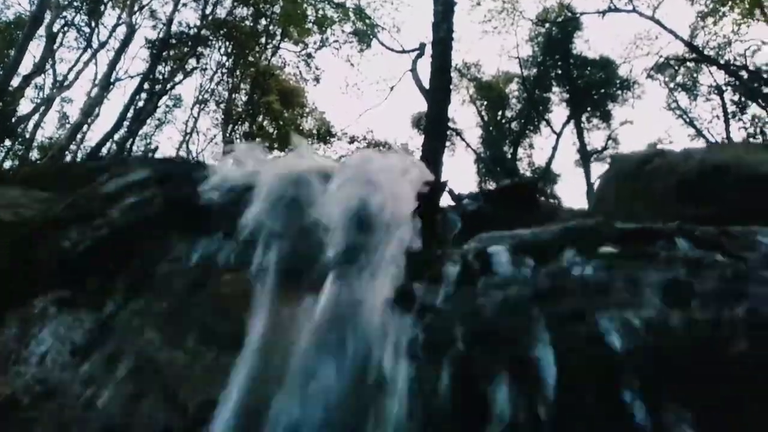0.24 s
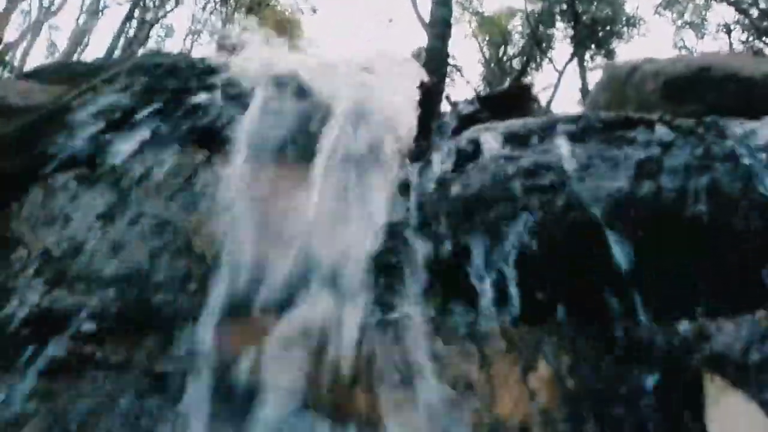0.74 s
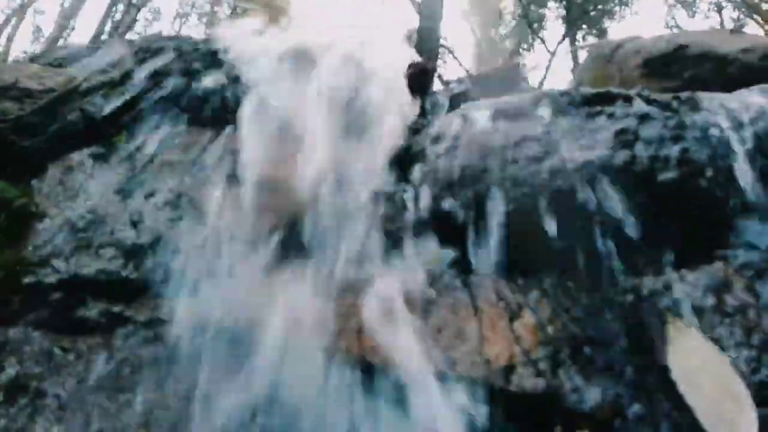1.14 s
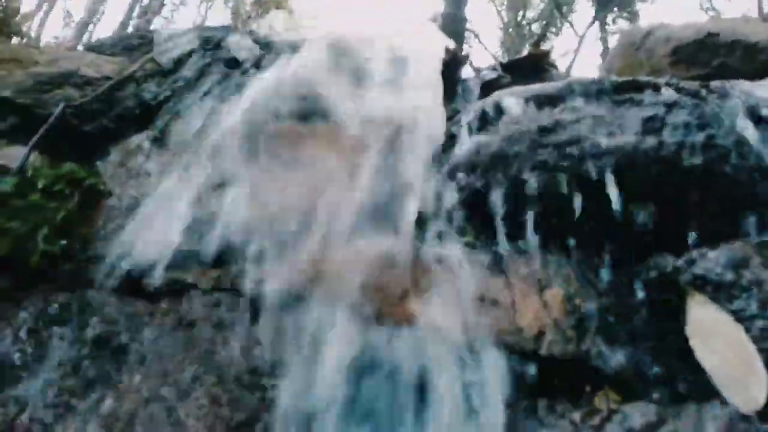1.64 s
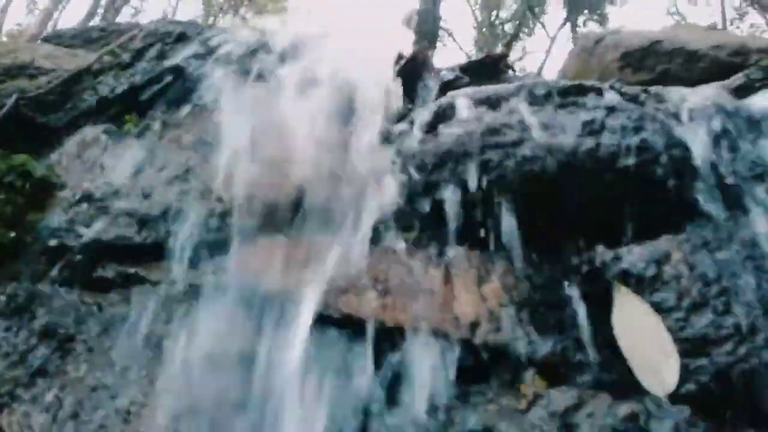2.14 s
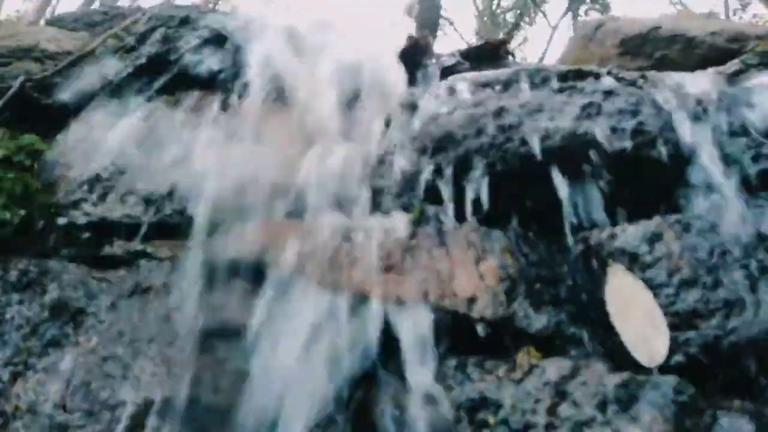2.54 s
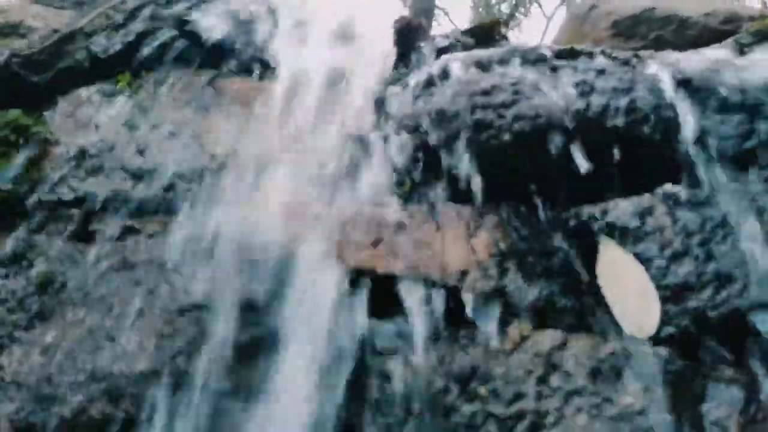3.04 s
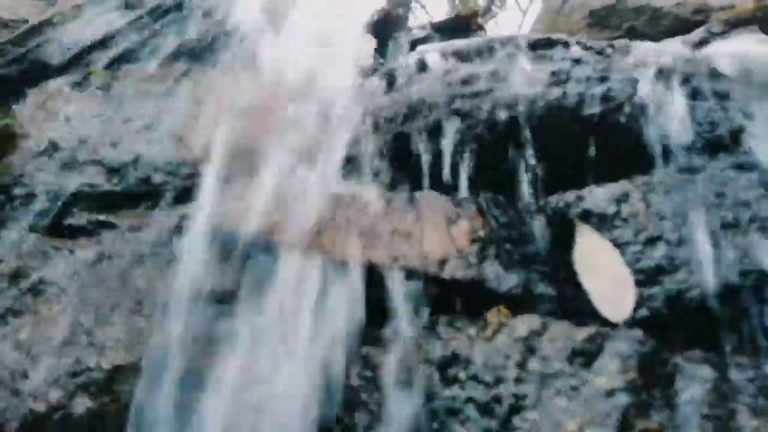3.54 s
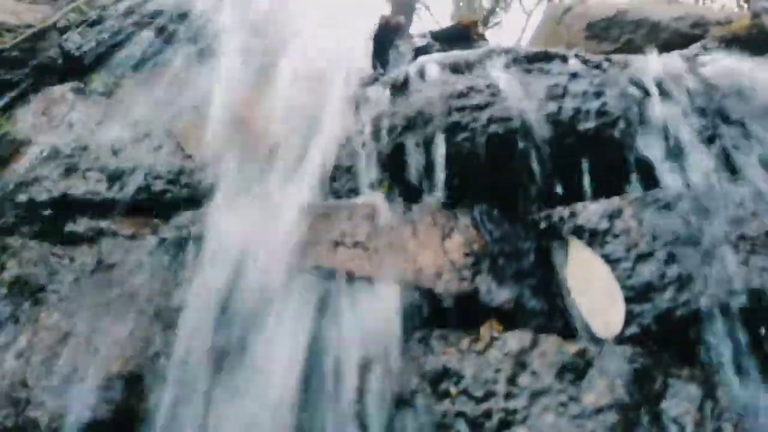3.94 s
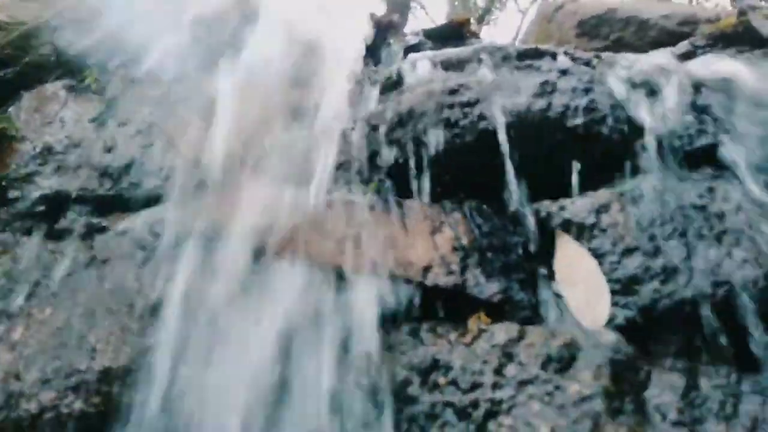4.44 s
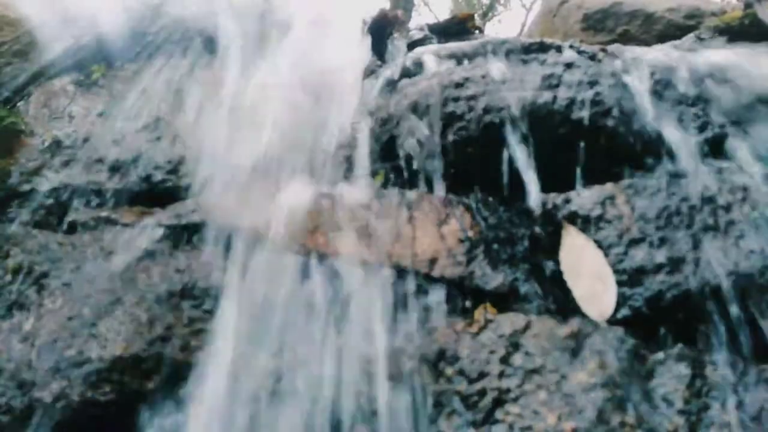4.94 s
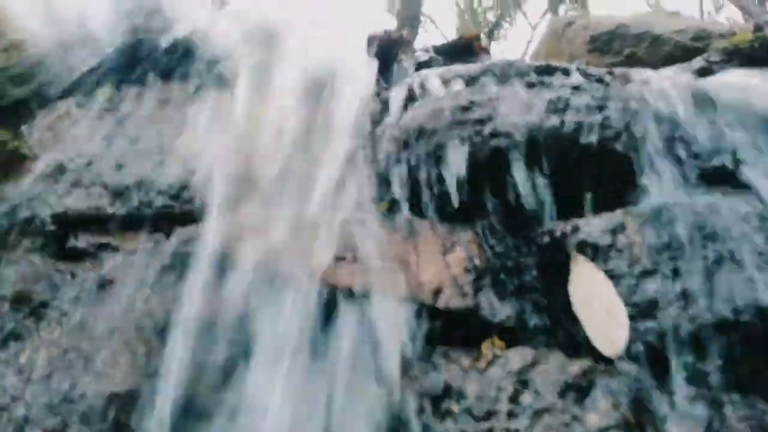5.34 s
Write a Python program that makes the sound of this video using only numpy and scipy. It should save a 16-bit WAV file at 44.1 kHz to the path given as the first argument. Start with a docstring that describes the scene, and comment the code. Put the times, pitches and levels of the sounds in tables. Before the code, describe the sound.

From the start, a small waterfall splashes over rocks close to a hand-held mono microphone. Spray fizzes, drops tick, clumps of water slap the stone and bubbles give short gulps. The flow is fairly steady, with brief dips near 0.1 and 0.9 seconds. From about 1.4 seconds a hand rubs the microphone, making a low rumble, with a quick cluster of dull thuds around 1.8 seconds and softer ones near 2.2. From about 1.7 seconds the hand also cups the microphone, so the water takes on a hollow tone that rises in pitch. At about 2.3 seconds everything cuts to silence. Just after 2.5 seconds the water returns much quieter, with the hollow tone and handling noise gone. It continues as a faint splashing hiss with small gurgles and slight lulls until the end at about 5.6 seconds.

```python
"""A small forest waterfall splashes over rocks, close to a hand-held mono microphone.
The stream swells, gushes and parts. Spray fizzes, drops tick, clumps of water slap the stone and
trapped air rings as bubbles. A hand rubs and bumps the camera and cups its microphone, which adds
a hollow tone. Then the sound cuts out for a moment and comes back much quieter."""
import sys
import numpy as np
from scipy import signal
from scipy.fft import rfft, irfft
from scipy.io import wavfile
from scipy.ndimage import uniform_filter1d

SR = 44100
rng = np.random.default_rng(int(sys.argv[2]) if len(sys.argv) > 2 else 0)


def file_out(sig):
    """Save sig as 16-bit WAV at sys.argv[1]."""
    # one column per channel
    cols = np.atleast_2d(sig).T
    # limit, then scale
    lim = np.clip(cols, -1, 1)
    pcm = np.round(lim * 32767).astype(np.int16)
    wavfile.write(sys.argv[1], SR, pcm)


N = 246959
TIME, FREQS = np.arange(N) / SR, np.fft.rfftfreq(N, 1 / SR)
GAP_START_S, GAP_END_S = 2.339, 2.549  # the sound cuts out between these times

# The tone of splashing water, from bass to treble: frequency_hz, level_db
WATER_TONE = [(25, -30), (70, -8.5), (150, -4.5), (330, -8), (500, -0.5), (1000, 1.5), (2200, -1.5),
              (3700, -4.5), (5200, -4.5), (6500, 0.5), (7400, -5), (8500, -9.5), (10500, -11)]


def amp(db):
    """Turns decibels into a number to multiply a sound by."""
    return 10 ** (np.asarray(db) / 20)


def unit(x):
    """Scales a signal to an average power of 1."""
    return x / np.sqrt(np.mean(x ** 2) + 1e-20)


def follow(rows):
    """Joins rows of (time_s, values...) with straight lines: one curve for each value."""
    times, *columns = np.transpose(rows)
    return [np.interp(TIME, times, column) for column in columns]


def tone_gain(points):
    """Turns rows of (frequency_hz, level_db) into a gain for every frequency, with average power 1."""
    hz, db = np.transpose(points)
    return unit(amp(np.interp(np.log(FREQS + 1), np.log(hz), db)))


def tint(x, gain):
    """Filters a sound: each frequency is multiplied by its own gain."""
    return irfft(rfft(x) * gain, N)


def add(mix, start_s, sound):
    """Adds a sound to the mix at the given time."""
    part = mix[max(round(start_s * SR), 0):][:len(sound)]
    part += sound[:len(part)]


def resonate(x, pitch_hz, width_hz):
    """Keeps the part of a sound near a steady or moving pitch, as a hollow space does."""
    turn = np.exp(2j * np.pi * np.cumsum(pitch_hz * np.ones(len(x))) / SR)
    decay = np.exp(-np.pi * width_hz / SR)
    return 2 * (turn * signal.lfilter([1 - decay], [1, -decay], x / turn)).real


def wander(top_hz):
    """A slow random wobble, mostly slower than top_hz."""
    slow_only = FREQS / (1 + FREQS) / (1 + (FREQS / top_hz) ** 4)
    return unit(tint(rng.standard_normal(N), slow_only))


def scatter(count, level_db, spread_db, low_hz, high_hz):
    """Makes random events as rows of (start_s, level_db, pitch_hz)."""
    when, strength, height = rng.random((count, 3)).T
    levels = level_db + spread_db * (2 * strength - 1)
    pitches = low_hz * (high_hz / low_hz) ** height
    return list(zip(when * N / SR, levels, pitches))


def impacts(per_s, spread_db):
    """Clicks at random times: many small ones, a few large."""
    size = amp(spread_db * np.minimum(rng.exponential(1, N), 4))
    return size * (rng.random(N) < per_s / SR)


def bursts(per_s, spread_db, fall_s):
    """The power of random splashes that start at once and die away; its average is 1."""
    decay = np.exp(-1 / (fall_s * SR))
    power = signal.lfilter([1], [1, -decay], impacts(per_s, spread_db) ** 2)
    return power / (power.mean() + 1e-20)


def spray(steady_share=0.3, wide_share=0.31, band_share=0.99, crackle_share=0.45, tick_db=-6):
    """Spray fizzes and drops tick; some splashes reach from bass to treble, others fill one octave."""
    wide_splashes = bursts(per_s=450, spread_db=4.5, fall_s=0.015)
    crackle = bursts(per_s=400, spread_db=4.3, fall_s=0.0008)
    ticks = unit(impacts(per_s=3000, spread_db=4.2) * rng.choice([-1, 1], N))
    fizz = unit(rng.standard_normal(N) + amp(tick_db) * ticks)
    octaves = np.log2(np.clip(FREQS, 200, 12800) / 200)
    out = np.zeros(N)
    for octave in range(7):
        band = np.cos(np.pi / 2 * np.clip(octaves - octave, -1, 1))
        # Small, high splashes are many and brief; bursting droplets are strongest in the treble.
        splashes = bursts(per_s=110 * 1.35 ** octave, spread_db=6.5, fall_s=0.02 / 1.22 ** octave)
        droplets = crackle_share * octave / octaves.max() * crackle
        power = steady_share + wide_share * wide_splashes + band_share * splashes + droplets
        out += tint(tint(fizz, band) * np.sqrt(abs(power)), band)
    return unit(out)


def bubble(start_hz, cycles, rise):
    """One bubble rings and fades; its pitch climbs as it nears the surface."""
    # Each step of 1 in age takes `cycles` swings at the starting pitch and fades the ring to 37%.
    age = np.arange(int(5 * cycles / start_hz * SR)) * start_hz / (cycles * SR)
    tone = np.sin(2 * np.pi * cycles * (age + rise * age ** 2 / 2))
    onset = 1 - np.exp(-2 * cycles * age)
    return tone * onset * np.exp(-age)


def fine_bubbles(per_s_at_1khz=22, cycles_at_1khz=6):
    """Bubbles of all sizes ring briefly; the small, high ones are the most common."""
    out = np.zeros(N)
    for hz in np.geomspace(330, 7000, 36):
        ring = bubble(hz * rng.uniform(0.96, 1.04), cycles_at_1khz * np.sqrt(hz / 1000), rise=0.045)
        births = impacts(per_s_at_1khz * hz / 1000, spread_db=3.8)
        out += hz ** 0.25 * unit(signal.oaconvolve(births, ring)[:N])
    return unit(out)


def waterfall(spray_db=-2, bubbles_db=-12, pool_db=-2.5, pool_top_hz=1000, pool_extra_swell=1.6):
    """Spray and bubbles swell with the flow; their low end, the churning pool, swells even more."""
    # The strength of the falling water: time_s, level_db
    flow = [(0, -38.5), (.33, -40), (.5, -38.5), (.8, -39), (1.19, -40), (1.36, -39.3), (1.7, -40),
            (1.93, -39), (2.12, -42.5), (2.54, -41), (2.66, -38.7), (2.88, -41), (3.35, -38.5), (3.68, -41),
            (4.0, -39), (4.42, -40), (4.95, -39.5), (5.6, -39.5)]
    water = tint(amp(spray_db) * spray() + amp(bubbles_db) * fine_bubbles(), tone_gain(WATER_TONE))
    pool = tint(water, 1 / (1 + (FREQS / pool_top_hz) ** 4))
    flow_db = follow(flow)[0] + 0.5 * wander(top_hz=7.8)  # the stream is never quite even
    churn_db = pool_db + pool_extra_swell * (flow_db - flow_db.mean()) - 0.06 * wander(top_hz=7.8)
    return amp(flow_db) * (water - pool + amp(churn_db) * pool)


def slaps(boost_db=2, ring_gain=2, rise_s=0.0011, fade_s=0.037):
    """Clumps of water hit the rock and burst into spray, each with a short hollow ring."""
    # The heaviest clumps: start_s, level_db, pitch_hz
    heavy_clumps = [(0.008, -36, 1000), (0.092, -36.5, 4040), (0.197, -37, 2030), (0.289, -33.5, 5000),
                    (0.425, -33.5, 4800), (0.469, -33, 2860), (0.691, -36, 6200), (0.714, -36, 6200),
                    (0.789, -32, 2100), (0.859, -36, 6200), (0.867, -37, 700), (0.921, -34, 6200),
                    (1.268, -39.5, 2830), (1.296, -35.5, 6260), (1.355, -35.5, 6350), (1.5, -34.5, 6860),
                    (1.629, -34, 4130), (1.718, -34.5, 6960), (1.906, -38, 4770), (2.044, -34.5, 5660),
                    (2.635, -33.5, 2100), (2.682, -36.5, 6240), (2.724, -35.5, 6900), (3.107, -41, 5430),
                    (3.197, -38, 2100), (3.324, -35.5, 6100), (4.138, -35, 6200), (4.3, -36.5, 6900),
                    (4.482, -36, 1200), (5.305, -36, 1200)]
    light_clumps = scatter(count=30, level_db=-40.5, spread_db=-1.5, low_hz=1200, high_hz=7000)
    out, t = np.zeros(N), np.arange(SR // 10) / SR
    envelope = (1 - np.exp(-t / rise_s)) * amp(-60 * t / fade_s)
    for start_s, level_db, pitch_hz in heavy_clumps + light_clumps:
        noise = rng.standard_normal(len(t))
        splash = unit(noise + ring_gain * resonate(noise, pitch_hz, width_hz=900))
        add(out, start_s, amp(level_db + boost_db) * envelope * splash)
    return tint(out, tone_gain(WATER_TONE))


def stream_parting(gush_db=1.15, gush_s=0.14):
    """A volume curve: the stream gushes, drops suddenly as it parts, then builds up again."""
    # Moments when the stream parts and misses the rock: start_s, length_s, dip_db
    lulls = [(0.123, 0.059, -5.5), (0.87, 0.074, -9), (2.902, 0.1, -3.5), (3.531, 0.058, -6.5),
             (4.057, 0.13, -5.5), (5.167, 0.082, -5.5)]
    gain_db = np.zeros(N)
    for start_s, length_s, dip_db in lulls:
        gain_db += gush_db * np.exp(-abs(TIME - start_s) / gush_s) * (TIME < start_s)
        progress = (TIME - start_s) / length_s
        gain_db += dip_db * np.interp(progress, [0, 0.04, 0.39, 1], [0, 1, 1, 0])
    return amp(gain_db)


def gulps(boost_db=5.5, cycles_at_1khz=4.43, rise_at_1khz=0.051, db_per_octave=3):
    """Pockets of air gulp in the pool; the biggest ring for the fewest swings and slide up the most."""
    # The main air pockets: start_s, level_db, pitch_hz
    main_pockets = [(0.18, -44, 530), (0.466, -34, 1520), (0.547, -46, 700), (0.723, -38, 1116),
                    (0.865, -36, 687), (1.223, -49.5, 280), (1.274, -37, 545), (1.383, -36, 835),
                    (1.452, -38, 886), (1.516, -35.5, 1090), (1.629, -39.5, 1160), (1.93, -40, 2520),
                    (3.268, -33, 1580), (3.309, -43.5, 300), (3.333, -38.5, 740), (3.661, -35, 2010),
                    (3.948, -36, 672), (3.965, -38.5, 845), (4.042, -41, 910), (4.208, -36, 1095),
                    (4.48, -44, 1130), (4.66, -50, 217), (4.722, -39, 1800), (4.855, -45, 450),
                    (5.136, -43, 518)]
    extras = scatter(count=36, level_db=-44, spread_db=5.5, low_hz=456, high_hz=2560)
    # Among the random extras, deeper ones are weaker.
    extras = [(s, db + db_per_octave * np.log2(hz / 1000), hz) for s, db, hz in extras]
    out = np.zeros(N)
    for start_s, level_db, pitch_hz in main_pockets + extras:
        size = 1000 / pitch_hz  # 1 for a bubble that rings at 1000 Hz
        rise = rise_at_1khz * size
        ring = bubble(pitch_hz / (1 + rise), cycles_at_1khz / np.sqrt(size), rise)
        add(out, start_s, amp(level_db + boost_db) * ring)
    return out


def hand_on_camera(rub_db=-1, bump_rise_s=0.003):
    """A hand rubs and bumps the camera; the case carries this as a low rumble and dull thuds."""
    # How hard the hand rubs: time_s, level_db
    grip = [(1.2, -80), (1.48, -59.5), (1.6, -64), (1.72, -60), (1.8, -49), (1.92, -57.5), (2.13, -76),
            (2.22, -50.5), (2.33, -54)]
    # The tone of rubbing heard through the case: frequency_hz, level_db
    case_tone = [(12, -24), (28, -1), (48, 3.5), (80, -1), (130, -5.5), (200, -17), (320, -44.5),
                 (900, -89.5)]
    # Bumps of the hand: start_s, level_db, pitch_hz
    bumps = [(1.768, -32.5, 73.4), (1.788, -36.5, 62), (1.851, -34.5, 82), (2.164, -42.5, 44.3),
             (2.225, -48, 54.3)]
    rumble = unit(tint(rng.standard_normal(N), tone_gain(case_tone)))
    out = amp(follow(grip)[0] + rub_db) * rumble * (TIME < GAP_END_S)
    t = np.arange(SR // 8) / SR
    envelope = t / bump_rise_s * np.exp(1 - t / bump_rise_s)
    for start_s, level_db, pitch_hz in bumps:
        add(out, start_s, amp(level_db) * envelope * np.sin(2 * np.pi * pitch_hz * t))
    return out


def cupped_hand(sound, shade_db=-1.5, low_ring_gain=2.28, notch_depth=0.34):
    """A hand shades the microphone; its hollow rings higher as it closes and cancels some treble."""
    # The hand closing in: time_s, closure (0 open, 1 shut), high_ring_gain
    cupping = [(1.66, 0, 0), (1.8, 0.27, .5), (1.94, 0.43, 0.77), (2.06, .56, 0.77), (2.18, 0.7, 0.38),
               (2.32, 0.97, 0.49)]
    closure, high_ring_gain = follow(cupping)

    def ring(pitch_hz, width_hz):
        """One ring of the hollow, filtered twice to narrow it."""
        return resonate(resonate(sound, pitch_hz, width_hz), pitch_hz, width_hz)

    low_ring = ring(pitch_hz=np.interp(closure, [0, 1], [1700, 2380]), width_hz=1500)
    high_ring = ring(pitch_hz=np.interp(closure, [0, 1], [4400, 5350]), width_hz=1300)
    hollow = low_ring_gain * closure ** 2.1 * low_ring + high_ring_gain * high_ring
    lost_treble = notch_depth * np.sqrt(closure) * ring(pitch_hz=11900, width_hz=1700)
    shaded = amp(shade_db * closure) * (sound - lost_treble)
    return np.where(TIME < GAP_END_S, shaded + hollow, sound)  # uncovered again after the gap


def scene():
    """The water and the hand, the same in both ears."""
    water = stream_parting() * (waterfall() + slaps() + gulps())
    mono = cupped_hand(water) + hand_on_camera()
    return np.array([mono, mono])


def record(dry, after_gap_db=-14.5, top_hz=15810):
    """The microphone adds a high ring and loses the very top; the sound cuts out and returns quieter."""
    # The ring of the microphone's small opening: frequency_hz, boost_db
    opening_ring = [(11000, 0), (12200, .7), (13300, 2.7), (14300, 6.5), (15700, 13)]
    heard = tint(dry, amp(np.interp(FREQS, *np.transpose(opening_ring))))
    volume = (TIME < GAP_START_S) + amp(after_gap_db) * (TIME > GAP_END_S)
    volume = uniform_filter1d(volume, size=24)  # softens the edges of the gap
    treble_cut = signal.firwin(1201, top_hz, window=("kaiser", 8), fs=SR)
    return signal.oaconvolve(heard * volume, treble_cut[None], "same")


dry = scene()
out = record(dry)
file_out(out)
```